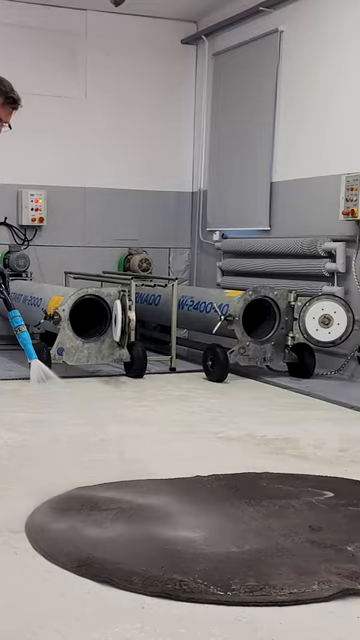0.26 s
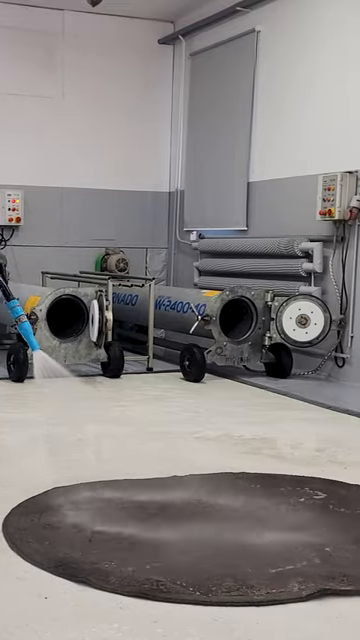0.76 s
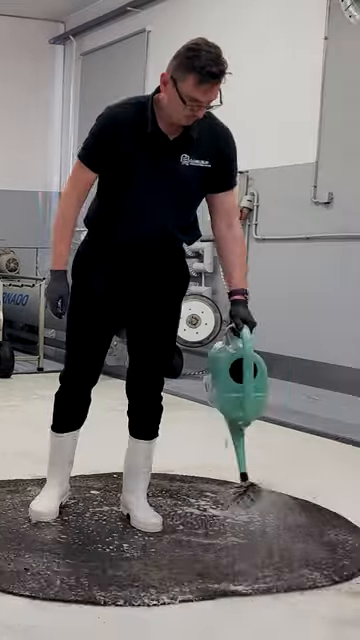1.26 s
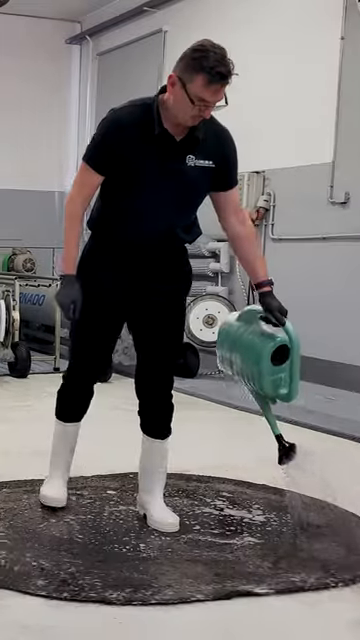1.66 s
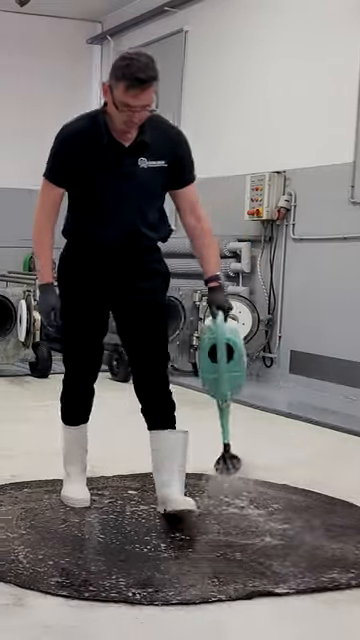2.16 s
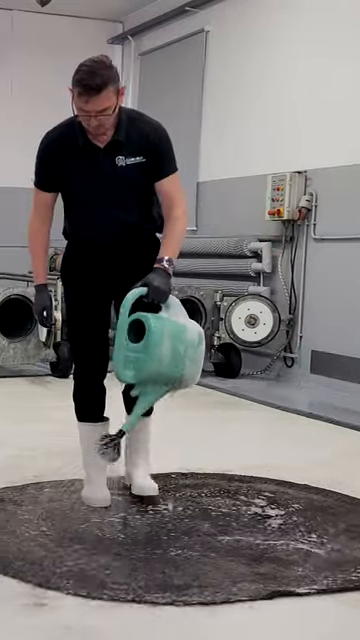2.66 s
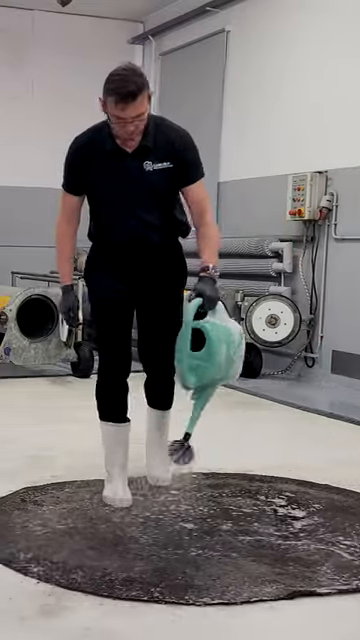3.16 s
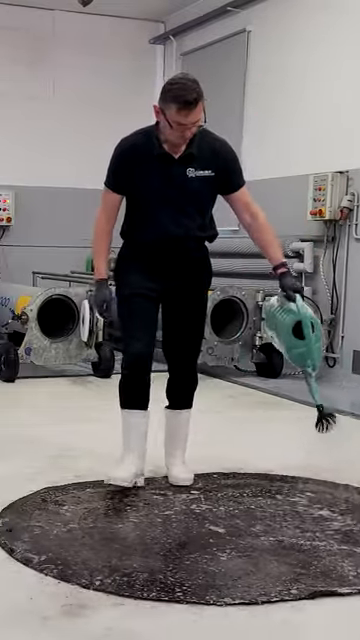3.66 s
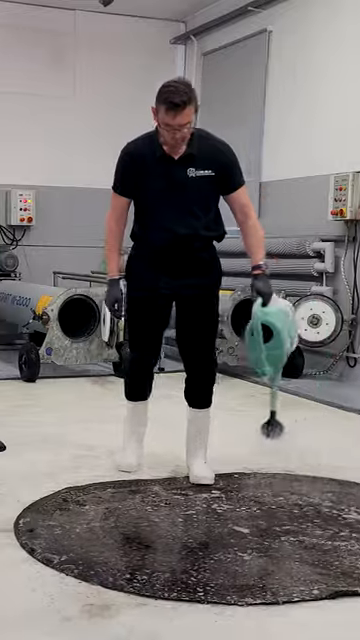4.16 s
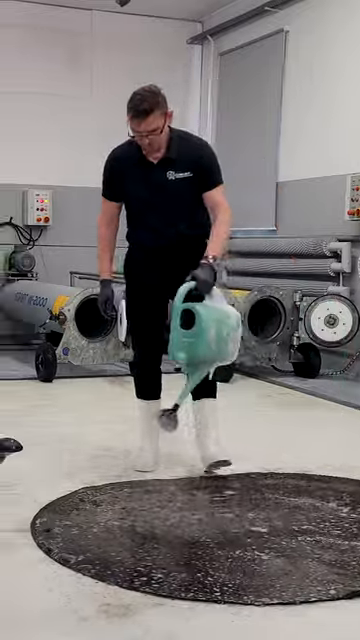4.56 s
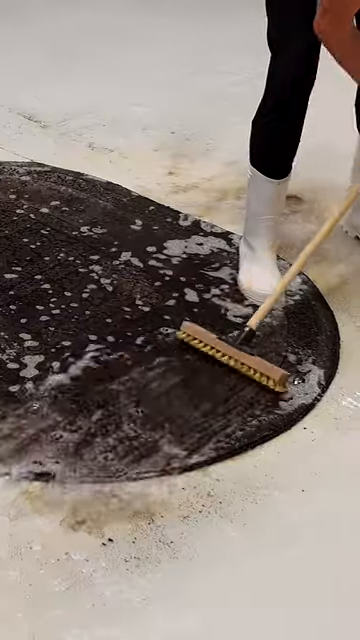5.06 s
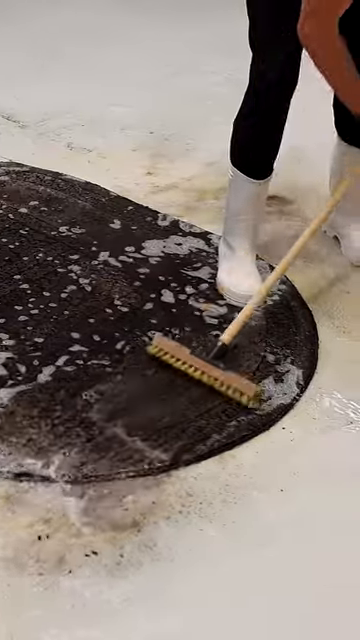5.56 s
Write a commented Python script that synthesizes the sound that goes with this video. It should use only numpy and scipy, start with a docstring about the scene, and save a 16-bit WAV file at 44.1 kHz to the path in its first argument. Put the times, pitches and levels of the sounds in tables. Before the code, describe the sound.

A hard, sputtering water jet drums on a wet rug, then a watering can patters and glugs, then a stiff brush scrubs three times.

```python
"""Hard, sputtering spray hisses, splashes and drums on a wet rug: a hose lance, which then swings away.
A watering can showers fine ticking drops while the soaked pile drums, bubbles and glugs; boots rumble.
Last, a stiff brush is pushed three times and drawn lightly back; thuds and a faint hum lie beneath.
Coloured noise and random impacts make spray, drumming and bristles; decaying sines make the drops,
glugs, plinks and thuds. Decaying noise gives the workshop's echoes."""
import sys
import numpy as np
from scipy import signal
from scipy.fft import rfft, irfft
from scipy.io import wavfile

SR = 44100
rng = np.random.default_rng(int(sys.argv[2]) if len(sys.argv) > 2 else 0)


def transcribe(signal):
    """Save signal, clipped to [-1, 1], as a 16-bit WAV file at the path in sys.argv[1]."""
    frames = np.atleast_2d(signal).T
    limited = np.clip(frames, -1, 1)
    pcm = np.round(limited * 32767).astype(np.int16)
    wavfile.write(sys.argv[1], SR, pcm)


N = 255780
TIME, FREQ = np.arange(N) / SR, np.maximum(np.fft.rfftfreq(N, 1 / SR), 1)
MIC_GAP_M, SOUND_M_PER_S, CUTOFF_HZ = .15, 343, 15900

# Jet force on the rug, as splash drive: (time [s], level before SPLASH_GAIN_DB [dB])
JET_FORCE = [(0.0, -45), (0.36, -48), (0.778, -46.5), (0.922, -47.5), (1.432, -51), (1.684, -59.5),
             (1.85, -70)]
# Jet hits more squarely: (time [s], hold [s], rise [dB])
JET_SURGES = [(0.303, 0.089, 2.5), (0.55, 0.32, 2.5), (1.014, 0.047, 1.4)]
# Spectrum of the hissing mist: (frequency [Hz], relative density [dB per Hz])
MIST_COLOUR = [(5000, -10), (6500, -6), (7900, -3.5), (9200, -5.5), (10500, -0.5), (12000, 3), (13200, 6.5),
               (14500, 4), (15900, 0.5)]
# Spectrum of the jet's splash: (frequency [Hz], relative density [dB per Hz])
SPLASH_COLOUR = [(470, -58), (800, -12), (1190, -4), (1900, -3.5), (2540, -5), (4240, -3), (5340, -8.5),
                 (8000, -7.5), (10400, -6.5), (17600, -120)]
# Spectrum of the jet's drumming: (frequency [Hz], relative density [dB per Hz])
DRUM_COLOUR = [(60, -10), (95, -12.5), (125, -6), (200, -3), (270, 2.5), (420, 5), (560, 0), (680, -12.5),
               (800, 1), (1000, -11.5)]
# Hall resonances excited by the drumming: (frequency [Hz], width [Hz], lift [dB])
HALL_MODES = [(167.4, 13, 5.5), (220, 6.7, 8), (238, 13, 3), (274.3, 13.4, 9), (484.5, 11, 7),
              (597.5, 4.3, 21)]
# Heavy slugs of water: (time [s], pitch [Hz], level [dB])
WATER_SLUGS = [(0.01, 589.5, -43.5), (0.112, 470, -46), (0.209, 630, -46.5), (.31, 457.6, -44),
               (.36, 396, -51), (.385, 820, -46), (0.506, 420, -44.5), (.645, 421.4, -45.5), (.7, 461, -41),
               (.765, 328, -52), (.82, 760, -47), (.875, 605.5, -45), (.93, 580, -48), (.955, 780, -57),
               (1.039, 383, -48), (1.105, 332, -48.5), (1.17, 454, -49)]
JET_REF_DB, SPLASH_GAIN_DB = -47, 4
MIST_DB, MIST_FOLLOWS = -32, 0.71  # level at JET_REF_DB; share of the jet's swing in dB
DRUM_DB, DRUM_FOLLOWS = -48.5, 1.36
SURGE_ATTACK_S, SURGE_FALL_DB_PER_S = 0.066, 139
SCOOP_HZ, SCOOP_WIDTH_HZ, SCOOP_DEPTH = 2850, 1300, 0.41  # depth 0-1, reached as the jet fades
CHURN_HZ, CHURN_WIDTH_HZ, CHURN_DB = 760, 870, -50
SLUG_ATTACK_S, SLUG_HOLD_S, SLUG_FALL_DB_PER_S, SLUG_WIDTH_HZ = 0.0066, 0.0045, 282, 300

# Flow from the watering can: (time [s], level before the layer gains [dB])
SHOWER_FLOW = [(1.45, -41), (1.66, -45.5), (1.91, -40), (2.12, -37.5), (2.51, -38), (2.93, -36.5),
               (3.3, -39.5), (3.48, -42), (3.8, -41), (4.13, -38.5), (4.3, -38), (4.47, -39.5),
               (4.8, -47.5)]
# Spectrum of drops on wet pile: (frequency [Hz], relative density [dB per Hz])
PATTER_COLOUR = [(6000, -11.5), (7000, -8.5), (7900, -5.5), (8900, -7), (10200, -2.5), (11500, 0),
                 (13000, 3.5), (14400, 0), (15900, -2.5)]
# Spectrum of drops on foam: (frequency [Hz], relative density [dB per Hz])
SPATTER_COLOUR = [(2700, -13.5), (4200, -1), (5500, -5), (7000, -4.5)]
# Spectrum of drops in puddles: (frequency [Hz], relative density [dB per Hz])
PUDDLE_COLOUR = [(1350, -9.5), (1700, -6.5), (2400, 0), (3200, -1.5)]
# Shower crosses foam: (time [s], hold [s], level [dB])
FOAM_PATCHES = [(1.94, 0.17, -49), (3.48, 0.039, -56), (4.1, 0.18, -53.5), (4.3, 0.022, -55)]
# Shower meets standing water: (time [s], hold [s], level [dB])
PUDDLES = [(1.985, 0.14, -55.5), (3.15, 0.59, -63.5), (4.1, 0.05, -63), (4.375, 0.043, -57.5),
           (4.52, 0.14, -65.5)]
# Last water near the rug's edge: (time [s], hold [s], level [dB])
EDGE_SPLASHES = [(4.05, 0.067, -62), (4.38, 0.1, -58.5), (4.55, 0.15, -65)]
# Resonance of the edge splash: (frequency [Hz], width [Hz])
EDGE_RESONANCE = (1470, 1700)
# Single fat drops: (time [s], pitch [Hz], envelope peak [dB])
FAT_DROPS = [(1.637, 6360, -34), (1.68, 12500, -27), (1.976, 7500, -36), (2.254, 8550, -24),
             (2.269, 12500, -25), (2.384, 4200, -37), (2.483, 8000, -27), (2.499, 11900, -21),
             (2.776, 13500, -25), (2.878, 13000, -28), (2.891, 11000, -29), (3.529, 7700, -33),
             (3.622, 8200, -25), (3.816, 12500, -23), (4.011, 8100, -34), (4.14, 13000, -25),
             (4.247, 12500, -25)]
PATTER_GAIN_DB, SPATTER_GAIN_DB, PUDDLE_GAIN_DB = 3.0, -19.5, -40  # steady parts, over the flow
FOAM_ATTACK_S, FOAM_FALL_DB_PER_S = 0.17, 59
PUDDLE_ATTACK_S, PUDDLE_FALL_DB_PER_S = 0.025, 51
DRIPS_PER_S, DRIP_LOW_HZ, DRIP_HIGH_HZ, DRIP_CYCLES, DRIP_GAIN_DB = 700, 2380, 6300, 1.85, -14.5
SNAP_PEAK_S, SNAP_LAG_SAMPLES = 0.0002, 8

# Can swings over drumming pile: (time [s], hold [s], deep level [dB], hollow level [dB])
CAN_SWINGS = [(2.13, 0.33, -56, -56.5), (3.258, 0.45, -56.5, -58.5), (4.14, 0.16, -52.5, -52.5)]
# Water froths up: (time [s], hold [s], level [dB])
FROTHS = [(1.5, 0.17, -57), (1.85, 0.25, -61), (2.35, 0.1, -66), (3.05, 0.19, -59), (3.94, 0.11, -62),
          (4.42, 0.06, -58.5)]
# Bubbling wanders with the streams: (time [s], pitch before BUBBLING_RATIO [Hz])
BUBBLING_PITCH = [(1.55, 900), (1.87, 990), (2.43, 877), (2.9, 1110), (3.26, 880), (3.6, 1060),
                  (3.95, 1180), (4.21, 900), (4.75, 850)]
# Pockets dug in the water: (time [s], pitch [Hz], hold [s], level [dB])
WATER_POCKETS = [(1.857, 1037, 0.12, -66), (2.37, 902, 0.03, -54.5), (2.477, 913, 0.051, -58),
                 (3.094, 985, 0.061, -60), (3.232, 930, 0.06, -63)]
# Loudest glugs of the pouring: (time [s], pitch at the envelope top [Hz], envelope peak [dB])
POURING_GLUGS = [(2.185, 264, -49.5), (2.223, 276, -49), (2.334, 268, -49), (2.38, 265, -47),
                 (2.431, 265, -53), (2.469, 267, -59), (3.35, 284, -47), (3.397, 267, -49),
                 (3.492, 318, -51), (3.578, 290, -46.5), (3.63, 205, -53), (3.682, 312, -52),
                 (3.709, 206, -57), (3.852, 414, -49), (3.971, 370, -51), (4.051, 361, -49),
                 (4.124, 374, -45), (4.161, 363, -43), (4.243, 290, -41), (4.291, 285, -42),
                 (4.349, 282, -46.5), (4.44, 285, -53), (4.52, 280, -55)]
DEEP_HZ, DEEP_WIDTH_HZ = 284, 120
HOLLOW_HZ, HOLLOW_WIDTH_HZ, HOLLOW_LOW_CUT_HZ = 400, 270, 331  # before the glide
BUBBLING_HZ, BUBBLING_WIDTH_HZ = 1000, 274  # before the glide
HOLLOW_DB, BUBBLING_DB = -68.5, -66  # steady parts
SWING_ATTACK_S, SWING_SAG_DB_PER_S, SWING_FALL_DB_PER_S = 0.15, 8.5, 81
HOLLOW_LEAD_S, HOLLOW_ATTACK_S = 0.33, 0.39  # hollow note builds up ahead of the deep one
FROTH_ATTACK_S, FROTH_FALL_DB_PER_S = 0.023, 79
BUBBLING_RATIO, HOLLOW_FOLLOWS = 1.03, .5  # exponent: hollow note's share of the glide
BUBBLING_FADE_S = 0.34  # thins out as the can empties
POCKET_WIDTH_HZ, POCKET_ATTACK_S, POCKET_FALL_DB_PER_S = 130, 0.018, 117
GLUG_PEAK_S, GLUG_RISE_PER_S = 0.013, 0.45  # rise: share of pitch gained per second

# Brush pushes: (time [s], bristle hiss [dB], wet scrubbing [dB], time to full pressure [s],
# wait from the start of the push to the pull back [s])
BRUSH_STROKES = [(4.76, -34.5, -42.5, 0.11, 0.32), (5.212, -31.5, -35, 0.12, .295),
                 (5.673, -32.5, -40.5, 0.11, .29)]
# Spectrum of the bristles: (frequency [Hz], relative density [dB per Hz])
BRISTLE_COLOUR = [(3000, -6), (4000, -2.5), (5200, -6.5), (6500, -4), (8000, -4), (9400, -5), (11500, -2),
                  (13200, 2), (14500, -2), (15900, -7)]
# Spectrum of the scrubbing: (frequency [Hz], relative density [dB per Hz])
SCRUB_COLOUR = [(120, -24), (230, -15.5), (330, -12), (650, -1.5), (1250, 4), (1900, 3.5), (3000, -2),
                (5000, -4), (9000, -9.5)]
# Ringing of the wooden brush head: (frequency [Hz], width [Hz], lift [dB])
HEAD_MODES = [(353, 41, 7), (1300, 22, 5.5), (1420, 31, 0), (1720, 25, 0), (1804, 25, 3.5), (1930, 21, 6),
              (2150, 27, 5.5), (2390, 30, 4), (2600, 45, 5), (3470, 70, 5), (5180, 60, 3)]
# First bristles snap as the brush is set down: (time [s], pitch [Hz], envelope peak [dB])
BRISTLE_TOUCHES = [(4.742, 10600, -19.5), (4.749, 8500, -34), (4.752, 12000, -27)]
HISS_ATTACK_S, HISS_HOLD_S, HISS_FALL_DB_PER_S = 0.033, 0.084, 113
RETURN_DB, RETURN_ATTACK_S, RETURN_HOLD_S, RETURN_FALL_DB_PER_S = -42, 0.01, 0.031, 89
SCRUB_EASE, SCRUB_HOLD_S, SCRUB_FALL_DB_PER_S = 0.47, 0.0098, 110
SLOSH_DB, SLOSH_FALL_DB_PER_S = -36.5, 34.5  # wet pile churns on after each push
LANDING_S, CONTACT_DB = 4.737, -46  # set down; from then on the bristles stay in the pile

# Boot shuffling: (time [s], weight [gain])
BOOT_TREAD = [(2.05, 0.21), (2.3, 0.75), (2.8, 0.4), (3.15, 0.85), (3.7, 0.62), (4.4, 0.79), (4.65, 0.15)]
# Spectrum of the boots: (frequency [Hz], relative density [dB per Hz])
RUMBLE_COLOUR = [(35, -11), (60, 4.5), (85, -10), (110, 3.5), (150, -3.5), (200, 0), (240, -4)]
# Dull thuds on the floor: (time [s], level before the mode levels [dB])
FLOOR_THUDS = [(3.024, -54), (3.142, -49), (4.962, -53)]
# Floor resonances: (frequency [Hz], level [dB], 60 dB decay time [s])
FLOOR_MODES = [(64, 0, 0.24), (112, -7, 0.16)]
# Spectrum of the hall rumble: (frequency [Hz], relative density [dB per Hz])
HALL_COLOUR = [(25, -11), (45, -13), (65, -4), (85, -7.5), (130, -8), (230, -9), (300, -2), (410, 7.5),
               (700, 0), (1400, -11.5), (4000, -16)]
HUM_HZ, HUM_DB, HALL_DB = 60.5, -87, -58

# High treble leans left: (time [s], shade before the channel shares [dB])
TREBLE_SHADE = [(0, -1), (1.4, -1.3), (1.8, -6), (2.7, -6.5), (3.7, -5), (5.8, -4.5)]
# Band of the lean: (frequency [Hz], width [Hz])
SHADE_BAND = (12100, 3900)


def lance():
    """The jet breaks into hissing mist and splashes; heavier lumps of water drum on the rug."""
    jet_db = in_time(JET_FORCE)
    force_db = jet_db - JET_REF_DB
    surge_db = sum(db * swell(s, SURGE_ATTACK_S, hold, SURGE_FALL_DB_PER_S) for s, hold, db in JET_SURGES)

    spitting = from_db(0.86 * spurts(per_s=140, decay_s=0.0081))
    mist = sounding(grains(5000, 2.9, 0), colour(MIST_COLOUR), flutter_db=0.54, flutter_hz=70)
    out = from_db(MIST_DB + MIST_FOLLOWS * force_db) * spitting * mist

    splash = sounding(grains(1800, 3.7, -3), colour(SPLASH_COLOUR), flutter_db=1.0, flutter_hz=49.8)
    scooped = irfft(rfft(splash) * resonance(SCOOP_HZ, SCOOP_WIDTH_HZ), N)
    away = np.clip(1 - from_db(force_db), 0, 1) ** .5
    # the fading splash turns hollow
    out += from_db(jet_db + SPLASH_GAIN_DB) * (splash - SCOOP_DEPTH * away * scooped)

    # water churned up on the rug
    churn_response = resonance(CHURN_HZ, CHURN_WIDTH_HZ) ** 2
    churn = sounding(grains(400, 3.3, -3.5), churn_response, flutter_db=1.0, flutter_hz=12)
    out += from_db(CHURN_DB + force_db) * churn

    beating = wash() + from_db(-2.5) * impacts(per_s=500, spread_db=0.5)
    drum_response = colour(DRUM_COLOUR) * lifted(HALL_MODES)
    drum = sounding(beating, drum_response, flutter_db=1.5, flutter_hz=50)
    lumps = from_db(.8 * spurts(per_s=60, decay_s=.01))
    out += from_db(DRUM_DB + DRUM_FOLLOWS * force_db) * lumps * drum

    out *= during(JET_FORCE, fade_in=0.00021, fade_out=0.16)
    sputter_db = 0.48 * spurts(per_s=88, decay_s=0.0093)
    return out * from_db(surge_db + sputter_db)


def slugs():
    """Heavy slugs of water slap the rug: short bursts of one resonant noise, shifted in pitch."""
    response = resonance(HOLLOW_HZ, SLUG_WIDTH_HZ) ** 2
    slap = signal.hilbert(sounding(wash(), response, flutter_db=0.5, flutter_hz=10))
    out = np.zeros((2, N))
    for s, hz, db in WATER_SLUGS:
        span = slice(max(int(s * SR), 0), int((s + .25) * SR))
        gain = from_db(db) * swell(s, SLUG_ATTACK_S, SLUG_HOLD_S, SLUG_FALL_DB_PER_S)[span]
        shift = np.exp(2j * np.pi * (hz - HOLLOW_HZ) * TIME[span])
        add(out, s, gain * np.real(slap[:, span] * shift))
    return out


def shower():
    """Fine drops tick on the wet pile in little bursts, spatter on foam, splash and plink in water."""
    flow = from_db(in_time(SHOWER_FLOW))
    spatter_base = flow * from_db(SPATTER_GAIN_DB)
    puddle_base = flow * from_db(PUDDLE_GAIN_DB)
    spatter_gain = swells(FOAM_PATCHES, FOAM_ATTACK_S, FOAM_FALL_DB_PER_S, spatter_base)
    puddle_gain = swells(PUDDLES, PUDDLE_ATTACK_S, PUDDLE_FALL_DB_PER_S, puddle_base)

    patter = sounding(grains(3500, 3.5, -5.5), colour(PATTER_COLOUR), flutter_db=0.88, flutter_hz=39.8)
    spatter = sounding(grains(900, 1.1, -0.74), colour(SPATTER_COLOUR), flutter_db=1.75, flutter_hz=24.9)
    drips = plinks(DRIPS_PER_S, DRIP_LOW_HZ, DRIP_HIGH_HZ, DRIP_CYCLES, spread_db=7)
    puddle = sounding(grains(600, 2.2, -11.5), colour(PUDDLE_COLOUR), flutter_db=0.8, flutter_hz=25)

    out = flow * from_db(PATTER_GAIN_DB) * patter + spatter_gain * spatter
    out += from_db(DRIP_GAIN_DB) * together([spatter_gain, puddle_gain]) * drips
    out += puddle_gain * puddle
    bursts = from_db(0.3 * spurts(per_s=29, decay_s=0.046))
    return out * during(SHOWER_FLOW, fade_in=0.15, fade_out=0.018) * bursts


def edge_splashes():
    """Where the streams reach the rug's edge they splash lower and flatter."""
    gain = swells(EDGE_SPLASHES, PUDDLE_ATTACK_S, PUDDLE_FALL_DB_PER_S, 0)
    response = resonance(*EDGE_RESONANCE) ** 2
    return gain * sounding(grains(800, 2.2, -6), response, flutter_db=1.0, flutter_hz=30)


def snaps(rows):
    """Very short, bright ticks, each reaching the two microphones with a small lag of its own."""
    out = np.zeros((2, N))
    for s, hz, db in rows:
        tick = from_db(db) * bubble(hz, SNAP_PEAK_S, rise_per_s=0)
        lag = rng.integers(-SNAP_LAG_SAMPLES, SNAP_LAG_SAMPLES + 1)
        add(out[0], s, tick)
        add(out[1], s + lag / SR, tick)
    return out


def drumming():
    """The streams beat the soaked pile; the resonance that speaks changes as they wander over it."""
    deep_rows = [(s, hold, db) for s, hold, db, _ in CAN_SWINGS]
    hollow_rows = [(s - HOLLOW_LEAD_S, hold, db) for s, hold, _, db in CAN_SWINGS]
    deep_gain = swells(deep_rows, SWING_ATTACK_S, SWING_FALL_DB_PER_S, 0, SWING_SAG_DB_PER_S)
    hollow_gain = swells(hollow_rows, HOLLOW_ATTACK_S, SWING_FALL_DB_PER_S, from_db(HOLLOW_DB),
                         SWING_SAG_DB_PER_S)
    bubbling_gain = swells(FROTHS, FROTH_ATTACK_S, FROTH_FALL_DB_PER_S, from_db(BUBBLING_DB))

    deep_response = resonance(DEEP_HZ, DEEP_WIDTH_HZ) ** 2 * lifted(HALL_MODES)
    deep = sounding(wash(), deep_response, flutter_db=0.5, flutter_hz=22)
    low_cut = np.minimum(FREQ / HOLLOW_LOW_CUT_HZ, 1) ** 6
    hollow_response = resonance(HOLLOW_HZ, HOLLOW_WIDTH_HZ) ** 2 * low_cut
    hollow = sounding(wash(), hollow_response, flutter_db=0.5, flutter_hz=35)
    bubbling_response = resonance(BUBBLING_HZ, BUBBLING_WIDTH_HZ) ** 2
    bubbling = sounding(grains(500, 3.5, -3), bubbling_response, flutter_db=1.5, flutter_hz=30)

    bubbling_hz = BUBBLING_RATIO * in_time(BUBBLING_PITCH)
    hollow_hz = HOLLOW_HZ * (bubbling_hz / BUBBLING_HZ) ** HOLLOW_FOLLOWS
    drum = deep_gain * deep + hollow_gain * gliding(hollow, HOLLOW_HZ, hollow_hz)
    drum *= during(SHOWER_FLOW, fade_in=0.16, fade_out=0.65)
    bubbling_gain *= during(SHOWER_FLOW, fade_in=0.17, fade_out=BUBBLING_FADE_S)
    return drum + bubbling_gain * gliding(bubbling, BUBBLING_HZ, bubbling_hz)


def pockets():
    """Small air pockets under the streams ring with a narrow, hollow note."""
    response = resonance(BUBBLING_HZ, POCKET_WIDTH_HZ) ** 2
    note = signal.hilbert(sounding(wash(likeness=0.98), response, flutter_db=3.5, flutter_hz=30))
    out = np.zeros((2, N))
    for s, hz, hold, db in WATER_POCKETS:
        gain = from_db(db) * swell(s, POCKET_ATTACK_S, hold, POCKET_FALL_DB_PER_S)
        out += gain * np.real(note * np.exp(2j * np.pi * (hz - BUBBLING_HZ) * TIME))
    return out


def glugs():
    """Large air pockets gulp one by one as the water pours."""
    out = np.zeros((2, N))
    for s, hz, db in POURING_GLUGS:
        add(out, s, from_db(db) * bubble(hz, GLUG_PEAK_S, GLUG_RISE_PER_S))
    return out + from_db(-10.0) * echoes(out, t60_s=0.54, dull_hz=2000)


def brush():
    """Bristles flick through the wet pile; as the push bears down, tufts catch, twang and ring the head."""
    hiss_gains = [from_db(CONTACT_DB) * (TIME > LANDING_S)]
    scrub_gains = []
    for s, hiss_db, scrub_db, attack_s, wait_s in BRUSH_STROKES:
        push = swell(s, HISS_ATTACK_S, HISS_HOLD_S, HISS_FALL_DB_PER_S, ease=0.83)
        pull = swell(s + wait_s, RETURN_ATTACK_S, RETURN_HOLD_S, RETURN_FALL_DB_PER_S)
        press = swell(s, attack_s, SCRUB_HOLD_S, SCRUB_FALL_DB_PER_S, ease=SCRUB_EASE)
        slosh = swell(s, attack_s, 0, SLOSH_FALL_DB_PER_S, ease=1.6)
        hiss_gains += [from_db(hiss_db) * push, from_db(RETURN_DB) * pull]
        scrub_gains += [from_db(scrub_db) * press, from_db(SLOSH_DB) * slosh]

    flicks = sounding(grains(7000, 2.6, -4), colour(BRISTLE_COLOUR), flutter_db=0.0, flutter_hz=80.8)
    rasp_response = colour(SCRUB_COLOUR) * lifted(HEAD_MODES)
    rasp = sounding(grains(1500, 2.6, -4), rasp_response, flutter_db=0.36, flutter_hz=70)
    twangs = from_db(-12.5) * plinks(per_s=450, low_hz=1092, high_hz=4930, cycles=7.7, spread_db=9)
    catching = from_db(0.3 * spurts(per_s=180, decay_s=0.0047))
    return together(hiss_gains) * flicks + together(scrub_gains) * catching * (rasp + twangs)


def treading():
    """Rubber boots shuffle about under the shower with a soft rumble."""
    rumble = sounding(wash(likeness=0.68), colour(RUMBLE_COLOUR), flutter_db=2.5, flutter_hz=4.5)
    return in_time(BOOT_TREAD) * from_db(-63.0) * rumble


def thuds(rise_s):
    """Soft, heavy contacts with the floor boom briefly as decaying sines."""
    out = np.zeros(N)
    age = TIME[:SR]
    for s, db in FLOOR_THUDS:
        for hz, mode_db, t60_s in FLOOR_MODES:
            envelope = from_db(db + mode_db - 60 * age / t60_s) * (1 - np.exp(-age / rise_s))
            add(out, s, envelope * np.sin(2 * np.pi * hz * age))
    return out


def hall():
    """Low workshop rumble and a machine hum wavering in level and phase."""
    hum_gain = from_db(HUM_DB + 2.4 * drift(1.4)) * np.sqrt(2)
    hum = hum_gain * np.sin(2 * np.pi * HUM_HZ * TIME + .5 * drift(3.4))
    rumble = sounding(wash(likeness=0.93), colour(HALL_COLOUR), flutter_db=0.1, flutter_hz=4.2)
    return hum + from_db(HALL_DB) * rumble


def echoes(x, t60_s, dull_hz):
    """The dying, slightly dull tail of the workshop."""
    age = TIME[:SR]
    tail = rng.standard_normal((2, SR)) * from_db(-60 * age / t60_s) * (age > .008)
    tail /= np.sqrt(np.sum(tail ** 2, axis=1, keepdims=True))
    wet = signal.fftconvolve(x, tail, axes=1)[:, :N]
    low_pass = signal.butter(1, min(dull_hz, .45 * SR), fs=SR, output="sos")
    return signal.sosfilt(low_pass, wet)


def impacts(per_s, spread_db):
    """Random impacts of uneven size; each reaches the two microphones with a lag of its own."""
    at = np.flatnonzero(rng.random(N) < per_s / SR)
    size_db = spread_db * np.minimum(rng.exponential(1, len(at)), 5)
    size = from_db(size_db) * rng.choice([-1, 1], len(at))
    lag_s = rng.uniform(-1, 1, len(at)) * MIC_GAP_M / SOUND_M_PER_S
    lag = np.round(lag_s * SR).astype(int)
    out = np.zeros((2, N))
    out[0, at], out[1, (at + lag) % N] = size, size
    return rms_one(out)


def wash(likeness=1.0):
    """Noise for countless impacts blurred by the hall: a diffuse field, most alike in the bass."""
    alike = np.clip(likeness, 0, 1) * np.sinc(2 * FREQ * MIC_GAP_M / SOUND_M_PER_S)
    mid, side = rfft(rng.standard_normal((2, N)))
    return irfft(np.sqrt(1 + alike) * mid + np.sqrt(1 - alike) * side * [[1], [-1]], N)


def grains(per_s, spread_db, direct_db):
    """Direct impacts over a wash."""
    return impacts(per_s, spread_db) * from_db(direct_db) + wash()


def sounding(excitation, response, flutter_db, flutter_hz):
    """An excitation through a response, at unit power, then with a fluttering level."""
    return rms_one(irfft(rfft(excitation) * response, N)) * from_db(flutter_db * drift(flutter_hz))


def spurts(per_s, decay_s):
    """Lumps of water or tufts of bristle: each starts at once and dies away; spread 1."""
    kicks = rng.random(N) < per_s / SR
    lumps = signal.lfilter([1], [1, -np.exp(-1 / (decay_s * SR))], kicks + 1e-18)
    return rms_one(lumps - lumps.mean())


def bubble(hz, peak_s, rise_per_s):
    """One bubble: it swells, rings out and climbs in pitch at the given rate; envelope top 1."""
    age = TIME[:int(9 * peak_s * SR)]
    envelope = (age / peak_s * np.exp(1 - age / peak_s)) ** 2
    cycles = hz * age * (1 + rise_per_s * (age / 2 - peak_s))  # pitch is hz at peak_s
    return envelope * np.sin(2 * np.pi * (cycles + rng.random()))


def plinks(per_s, low_hz, high_hz, cycles, spread_db):
    """Short rings at random times and pitches, each of its own size and side; unit power."""
    out = np.zeros((2, N))
    for when, pitch, size, side in rng.random((int(per_s * N / SR), 4)):
        hz = low_hz * (high_hz / low_hz) ** pitch
        pan = np.array([[np.cos(np.pi * side)], [np.sin(np.pi * side)]])
        ring = bubble(hz, cycles / hz, rise_per_s=2.7)
        add(out, when * N / SR, from_db(spread_db * size ** 2) * pan * ring)
    return rms_one(out)


def colour(points):
    """A short spectrum as a gain per frequency, falling steeply beyond its ends."""
    hz, db = np.transpose(points)
    skirts = np.minimum(FREQ / hz[0], 1) ** 4 * np.minimum(hz[-1] / FREQ, 1) ** 4
    return from_db(np.interp(np.log(FREQ), np.log(hz), db)) * skirts


def resonance(hz, width_hz):
    """Response of one damped mode, 1 at its top."""
    return 1 / (1 + 1j * (FREQ ** 2 - hz ** 2) / (FREQ * width_hz))


def lifted(modes):
    """A flat response raised at each mode."""
    return 1 + sum((from_db(db) - 1) * resonance(hz, width_hz) for hz, width_hz, db in modes)


def gliding(x, centre_hz, pitch_hz):
    """Carry a narrow resonance from its centre along a moving pitch."""
    turn = np.exp(2j * np.pi * np.cumsum(pitch_hz - centre_hz) / SR)
    return np.real(signal.hilbert(x) * turn)


def swell(start_s, attack_s, hold_s, fall_db_per_s, ease=0.32, sag_db_per_s=0):
    """Builds up (the larger the ease, the softer its start), holds or sags, then dies away; top 1."""
    past_top_s = np.maximum(TIME - start_s - attack_s, 0)
    sag_db = sag_db_per_s * np.minimum(past_top_s, hold_s)
    fall_db = fall_db_per_s * np.maximum(past_top_s - hold_s, 0)
    return np.clip((TIME - start_s) / attack_s, 0, 1) ** ease * from_db(-sag_db - fall_db)


def swells(rows, attack_s, fall_db_per_s, steady, sag_db_per_s=0):
    """One swell for each (time [s], hold [s], level [dB]) row, over a steady or given gain."""
    parts = [steady]
    for s, hold_s, db in rows:
        parts.append(from_db(db) * swell(s, attack_s, hold_s, fall_db_per_s, sag_db_per_s=sag_db_per_s))
    return together(parts)


def together(parts):
    """Gains of unrelated noises add in power."""
    return np.sqrt(sum(part ** 2 for part in parts))


def in_time(rows):
    """A short curve at every sample."""
    return np.interp(TIME, *np.transpose(rows))


def during(rows, fade_in, fade_out):
    """1 over the span of a curve, faded at both ends [s]."""
    opening = np.clip((TIME - rows[0][0]) / fade_in, 0, 1)
    return opening * np.clip((rows[-1][0] - TIME) / fade_out, 0, 1)


def drift(rate_hz):
    """Slow random wander of spread 1, drawn every millisecond."""
    ticks_s = np.arange(0, N / SR + .002, .001)
    hz = np.fft.rfftfreq(len(ticks_s), ticks_s[1])
    slow = irfft(rfft(rng.standard_normal(len(ticks_s))) / (1 + (hz / rate_hz) ** 2), len(ticks_s))
    return np.interp(TIME, ticks_s, rms_one(slow - slow.mean()))


def add(out, s, sound):
    """Mix a short sound in at a time."""
    at = max(int(s * SR), 0)
    out[..., at:at + sound.shape[-1]] += sound[..., :N - at]


def from_db(db):
    """Decibels to gain."""
    return 10 ** (np.asarray(db) / 20)


def rms_one(x):
    """Scale to unit power."""
    return x / np.sqrt(np.mean(x ** 2) + 1e-20)


def scene():
    """Lance, watering can and brush in the echoing workshop; low sounds skip the shared echo."""
    work = lance() + slugs() + shower() + edge_splashes()
    work += snaps(FAT_DROPS) + snaps(BRISTLE_TOUCHES) + brush()
    low = drumming() + pockets() + glugs() + treading() + thuds(rise_s=0.0094) + hall()
    return work + from_db(-13.5) * echoes(work, t60_s=0.57, dull_hz=5030) + low


def record(dry):
    """The two microphones differ in the high treble; the top is cut steeply."""
    top = irfft(rfft(dry) * resonance(*SHADE_BAND), N)
    channel_db = in_time(TREBLE_SHADE) * np.array([[-.38], [.7]])  # left raised, right cut
    heard = dry + top * (from_db(channel_db) - 1)
    low_pass = signal.ellip(14, .1, 80, CUTOFF_HZ, fs=SR, output="sos")
    return signal.sosfilt(low_pass, heard)


dry = scene()
out = record(dry)
transcribe(out)
```